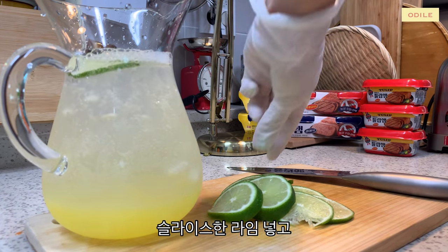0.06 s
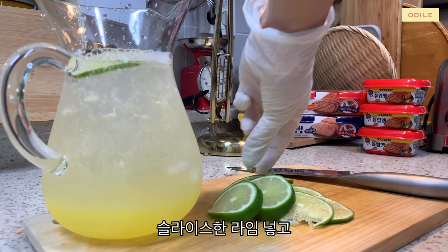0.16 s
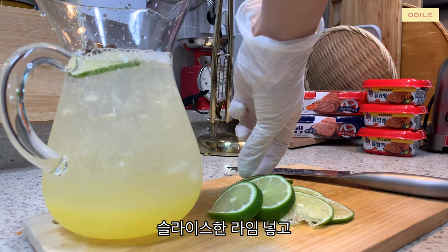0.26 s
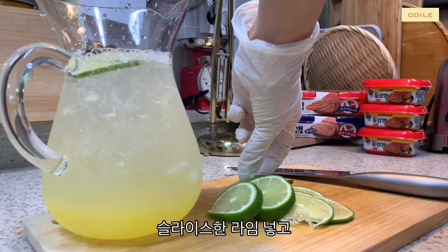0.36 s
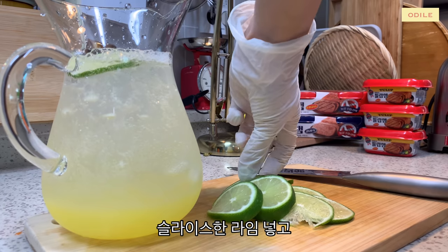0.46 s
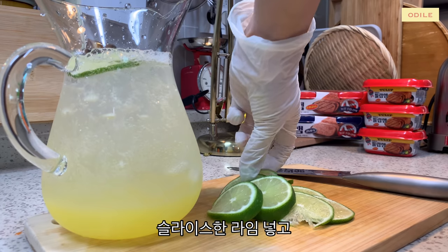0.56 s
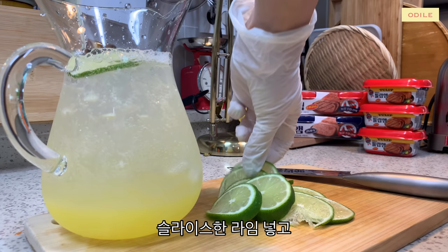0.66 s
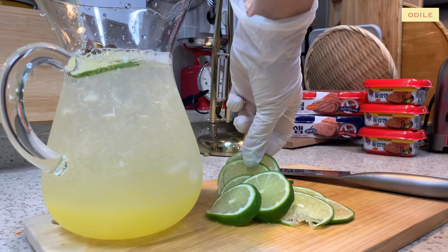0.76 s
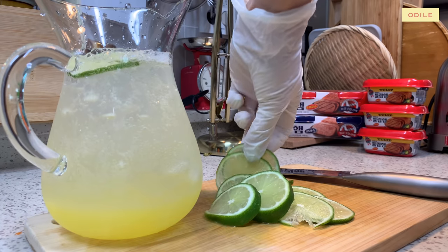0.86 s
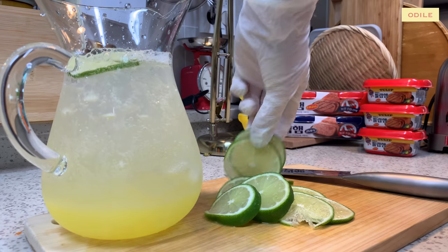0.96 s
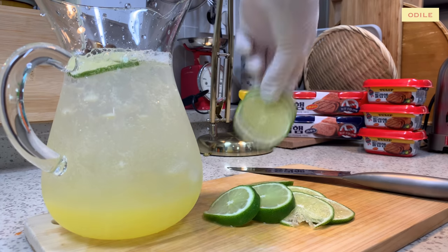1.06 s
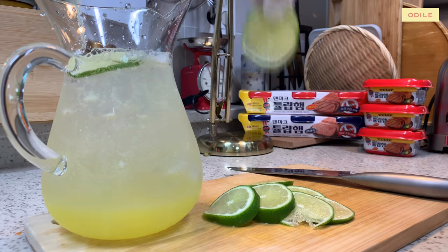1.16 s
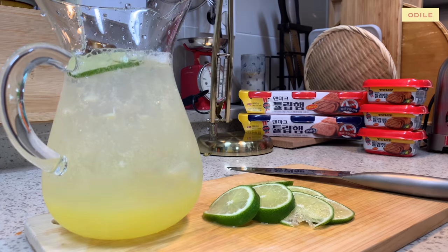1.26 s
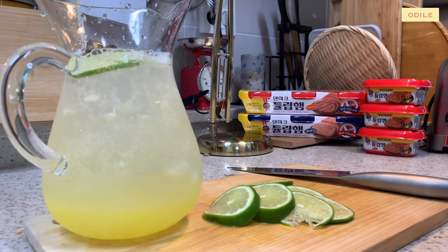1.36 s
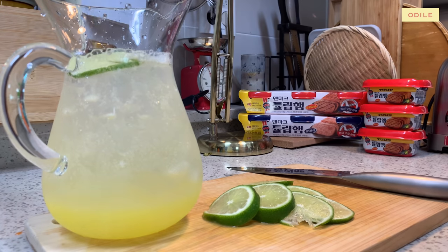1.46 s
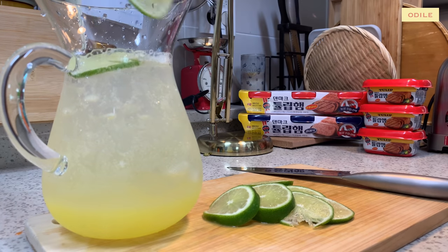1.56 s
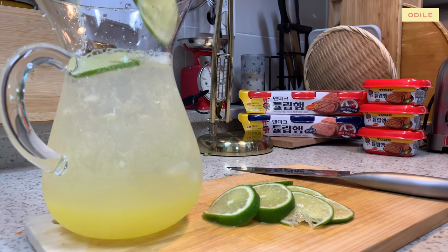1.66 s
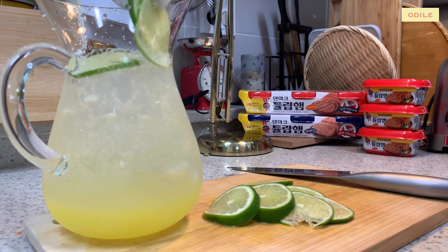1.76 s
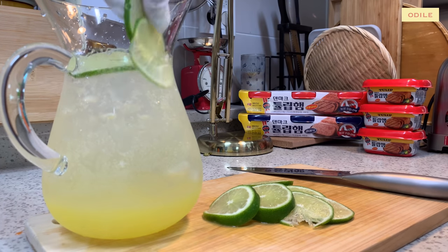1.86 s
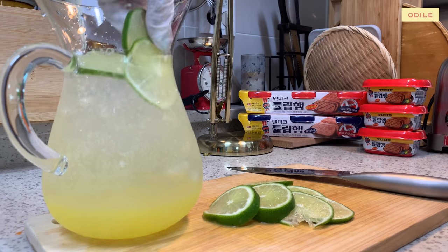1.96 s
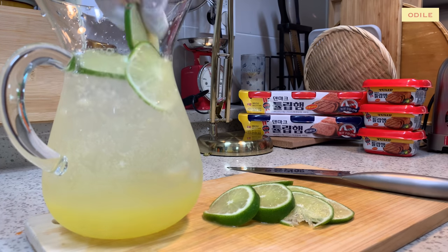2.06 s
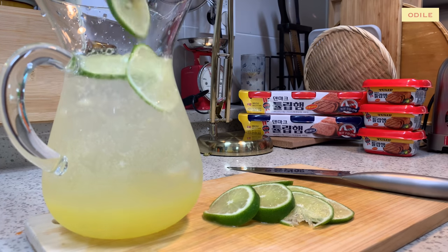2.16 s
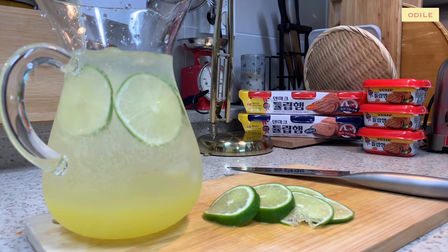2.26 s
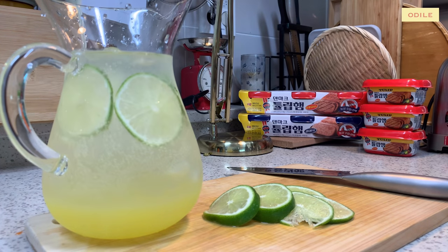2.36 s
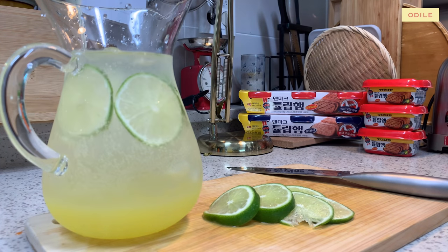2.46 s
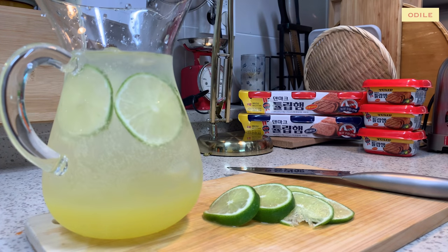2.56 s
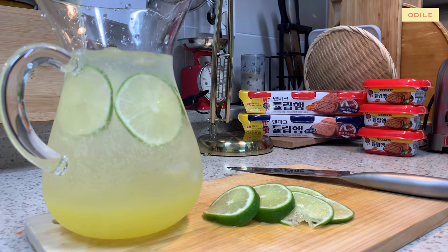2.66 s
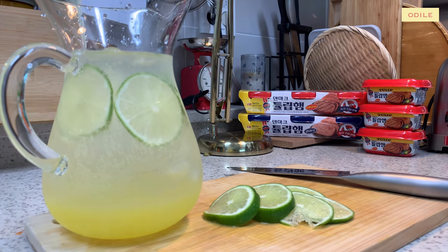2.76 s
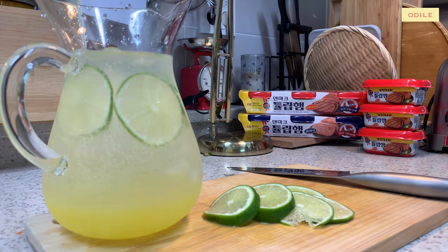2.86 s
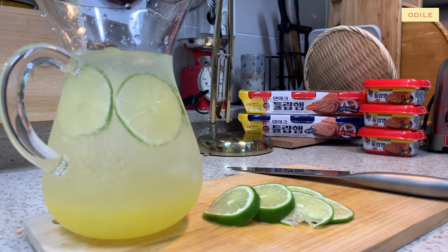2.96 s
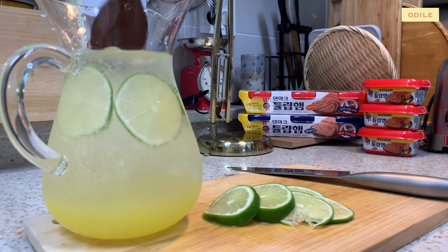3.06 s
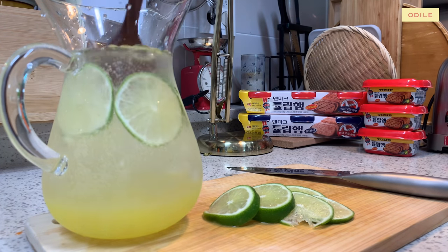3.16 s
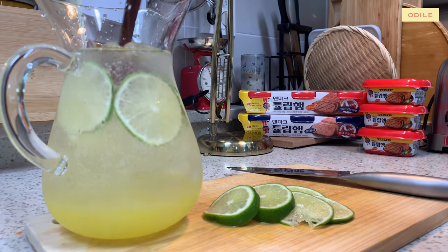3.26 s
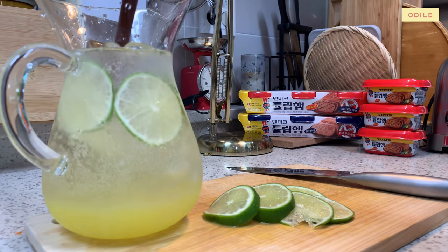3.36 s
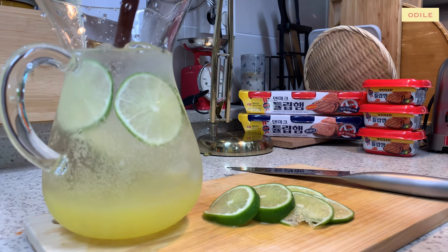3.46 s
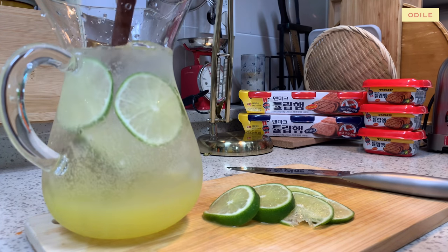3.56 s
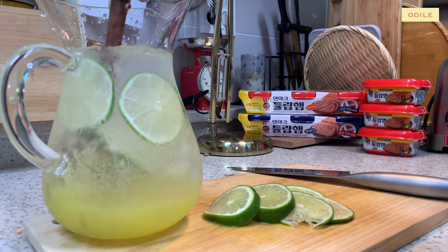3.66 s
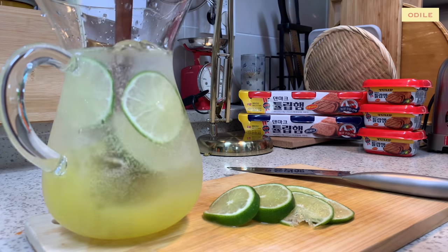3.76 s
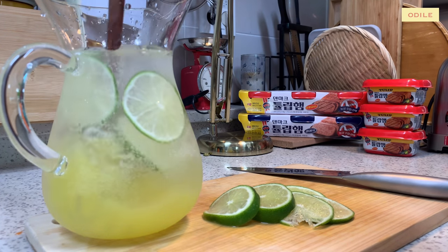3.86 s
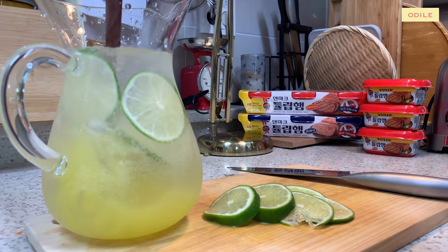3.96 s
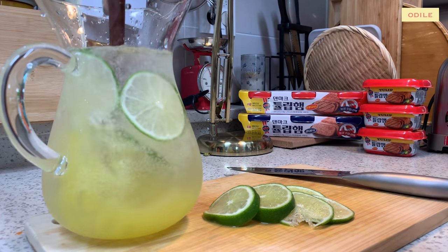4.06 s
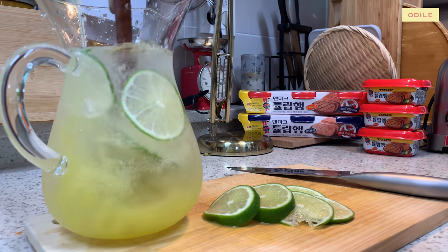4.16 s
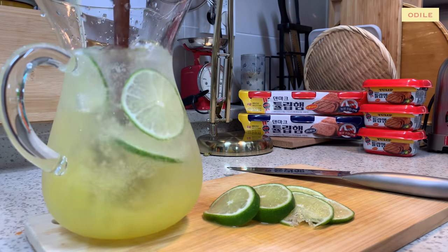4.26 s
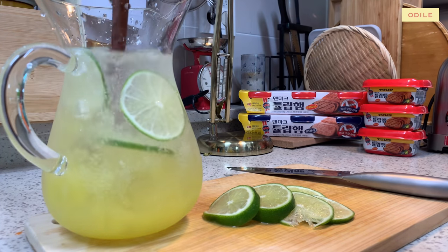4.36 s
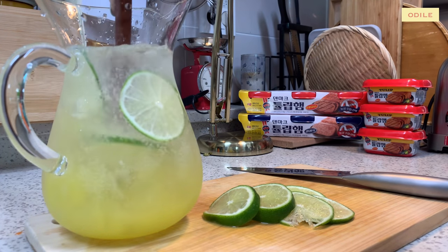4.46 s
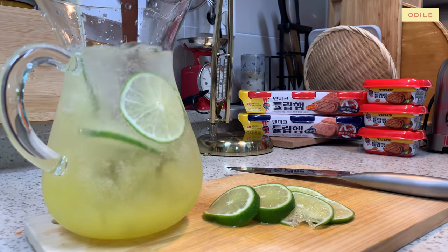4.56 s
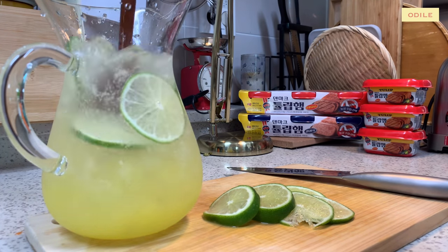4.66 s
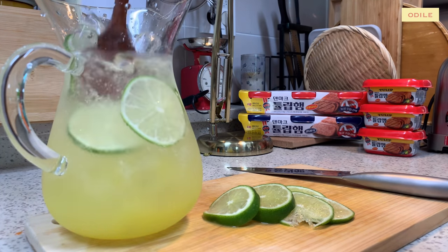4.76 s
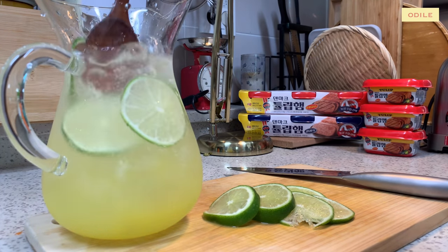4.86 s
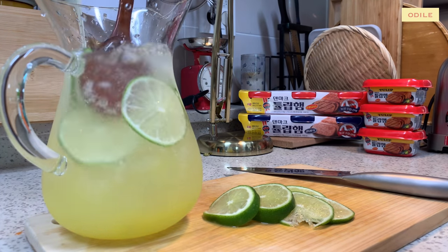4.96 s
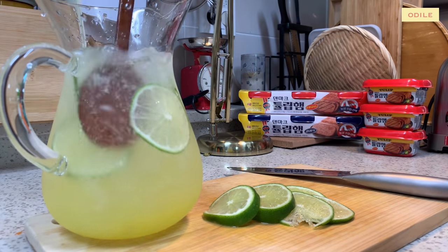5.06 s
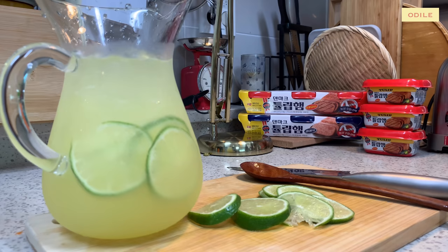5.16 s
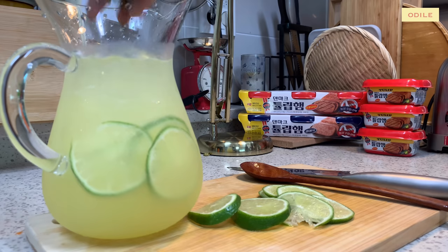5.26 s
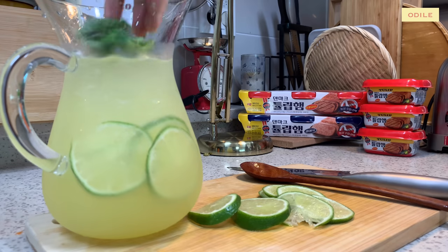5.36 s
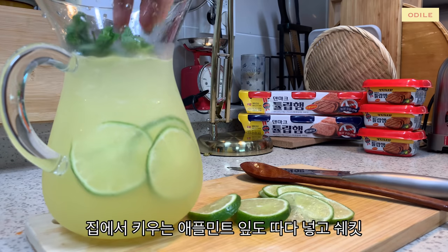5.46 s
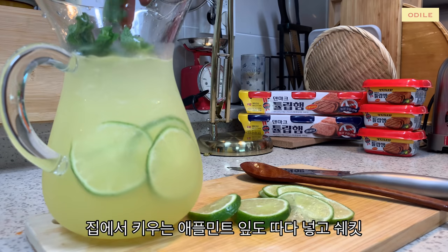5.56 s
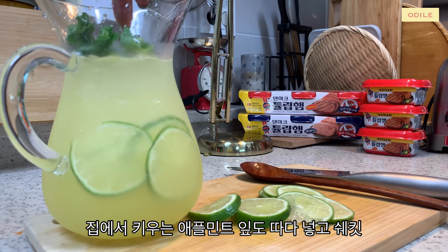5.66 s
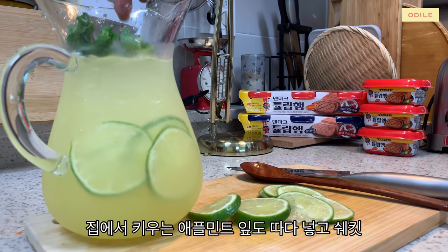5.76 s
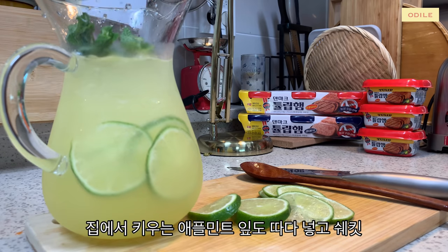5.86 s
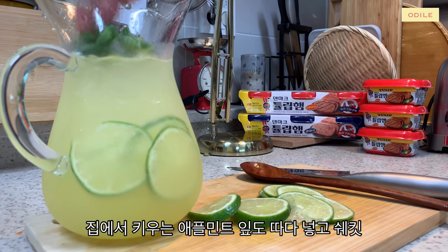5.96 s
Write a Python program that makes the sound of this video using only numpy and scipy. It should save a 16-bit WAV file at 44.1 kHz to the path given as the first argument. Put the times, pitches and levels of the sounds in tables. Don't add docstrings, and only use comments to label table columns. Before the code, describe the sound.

Fridge hum and faint glove crinkles, then lime slices drop onto ice in a glass pitcher, and a wooden spoon churns clattering cubes before leaves land.

```python
import sys
import numpy as np
from scipy import signal
from scipy.fft import rfft, irfft, next_fast_len
from scipy.io import wavfile
from scipy.ndimage import uniform_filter1d

SR = 44100
rng = np.random.default_rng(int(sys.argv[2]) if len(sys.argv) > 2 else 0)


def amplitude_ratio(level_db):
    exponent = np.asarray(level_db, float) / 20
    return 10 ** exponent


def generate_wav(signal):
    frames = np.transpose(np.atleast_2d(signal))
    scaled = np.clip(frames, -1, 1) * 32767
    pcm = np.round(scaled).astype(np.int16)
    wavfile.write(sys.argv[1], SR, pcm)


N = 264600

SCENE_CHANGES_S = [
    2.192,
    5.124,
]
# [pitch_hz, level_db, t60_s]
GLASS_MODES = [(2570, -6, .05), (2820, -7, .045), (3400, -19, .035), (3631, 0, .07), (3689, -1, .065),
               (3806, -6, .05), (3900, -10, .035), (4190, -12, .12)]
# [pitch_hz, level_db]
ICE_COLOUR = [(1500, -13), (2400, -2), (3300, 7), (5200, 1.5), (7200, 9), (8200, -6.5)]
# [pitch_hz, level_db]
TICK_COLOUR = [(6800, -7.5), (7800, 3.5), (9300, 1.5), (11500, -4.5), (14500, -6.5), (17000, -18)]


def evened(x):
    return x / np.sqrt(np.mean(x ** 2) + 1e-20)


def peaked(x):
    return x / (abs(x).max() + 1e-20)


def read(points, hz):
    f, value = np.transpose(points)
    return np.interp(np.log(hz + 1), np.log(f + 1), value)


def add(mix, s, sound):
    stop = min([change for change in SCENE_CHANGES_S if change > s] + [N / SR])
    part = mix[round(s * SR):round(stop * SR)][:len(sound)]
    part += sound[:len(part)]


def colour(x, points):
    log_gain = np.log(amplitude_ratio(read(points, abs(np.fft.fftfreq(2048, 1 / SR)))))
    taps = np.fft.ifft(np.exp(signal.hilbert(log_gain).conj())).real[:1024]
    return signal.oaconvolve(x, taps)[:len(x)]


def ring(modes, t):
    return sum(amplitude_ratio(db - 60 * t / t60) * np.sin(2 * np.pi * hz * t) for hz, db, t60 in modes)


def grains(per_s, spread_db, t60, rise=0.00059):
    size = amplitude_ratio(spread_db * np.minimum(rng.exponential(1, N), 4))
    size = size * (rng.random(N) < per_s / SR)
    fall = np.exp(-2 * np.log(1000) / (t60 * SR))
    swell = np.exp(-1 / (rise * SR))
    power = signal.lfilter([1 - swell], np.convolve([1, -fall], [1, -swell]), size ** 2)
    return evened(np.sqrt(abs(power) + 1e-12) * rng.standard_normal(N))


def contact(t60, rise):
    t = np.arange(1200) / SR
    return peaked(rng.standard_normal(len(t)) * amplitude_ratio(-60 * t / t60) * np.minimum(t / rise, 1))


def room_air():
    # [pitch_hz, level_db per Hz]
    air = [(25, -31), (53, -12), (85, -17), (172, -21), (218, -13), (258, -22), (320, -30), (390, -25),
           (650, -39), (960, -41.5), (1500, -48.5), (4000, -57.5), (7000, -50), (9500, -55), (14000, -56)]
    # [pitch_hz, likeness 0..1]
    likeness = [(60, .995), (250, .9), (450, .2), (1000, .05), (6300, .05), (7300, .45), (14000, .85)]
    frames, hz = N // 512 + 5, np.fft.rfftfreq(2048, 1 / SR)
    a, b, c, d, patches = rng.standard_normal((5, len(hz), frames))
    patches = uniform_filter1d(patches, size=14, axis=0)
    patches = evened(uniform_filter1d(patches, size=8, axis=1))
    same = np.clip(read(likeness, hz), -1, 1)[:, None]
    left = a + 1j * b
    right = same * left + np.sqrt(1 - same ** 2) * (c + 1j * d)
    z = np.array([left, right]) * amplitude_ratio(read(air, hz)[:, None] + 2.2 * patches)
    return amplitude_ratio(-56.5) * evened(signal.istft(z, nperseg=2048, noverlap=1536)[1][:, :N])


def fridge():
    # [pitch_hz, width_hz, level_db]
    tones = [(119.1, 2.5, -56), (238.4, 3, -56), (358, 5, -86), (476.6, 5, -84), (565.8, 6, -74),
             (735.5, 4, -86), (792, 5, -89), (961.5, 7, -82), (1580, 7, -96.5), (1610, 5.5, -87)]
    # [pitch_hz, left_over_right_db]
    balance = [(119, 2), (238, -4.5), (400, 0), (566, 6), (800, 0)]
    # [pitch_hz, lag_radians]
    lag = [(119, .35), (238, .85), (400, 0)]
    out, t = np.zeros((2, N)), np.arange(N) / SR
    hop, steps = 100, N // 100 + 2
    for hz, width_hz, db in tones:
        r = np.exp(-np.pi * width_hz * hop / SR)
        noise = rng.standard_normal(steps) + 1j * rng.standard_normal(steps)
        waver = signal.lfilter([1], np.convolve([1, -r], [1, -r]), noise)
        waver = np.interp(t, np.arange(steps) * hop / SR, waver)
        waver = 1 + 0.26 * waver / np.sqrt(np.mean(abs(waver) ** 2))
        tone = waver * np.exp(2j * np.pi * hz * t)
        aside = amplitude_ratio(.5 * read(balance, hz)) * np.exp(-.5j * read(lag, hz))
        out += amplitude_ratio(db) * (np.array([[aside], [1 / aside]]) * tone).real / np.std(tone.real)
    return out


def rustle():
    # [loudest_s, level_db, length_s]
    brushes = [(0.184, -71.5, 1), (0.53, -78, 0.15), (0.638, -62.5, 0.083), (0.824, -59.5, 0.038),
               (0.926, -76, 0.17), (1.721, -61, 0.088), (2.277, -71, 0.12), (2.453, -75.5, 0.23),
               (2.81, -74.5, 0.11), (2.967, -53.5, 0.023), (5.252, -77, 0.058), (5.366, -60.5, 0.18),
               (5.52, -73, 0.16)]
    crinkle_colour = [(900, -9.0), (2500, -5.0), (6000, -14.5), (10000, -7.5), (15000, -15.5)]  # Hz, dB
    edge_loss_db = 11.5
    t = np.arange(N) / SR
    brush = sum(amplitude_ratio(db - edge_loss_db * abs(t - s) / (length / 2)) for s, db, length in brushes)
    brush = brush * ((t < 3) | (t > SCENE_CHANGES_S[1]))
    return brush * evened(colour(grains(1400, 5.8, 0.014), crinkle_colour))


def snaps():
    # [start_s, peak_db, pitch_hz]
    creases = [(0.519, -58, 6000), (0.532, -53, 6150), (.533, -55, 10300), (.541, -60, 5900),
               (0.559, -62, 6200), (0.559, -53, 10200), (.585, -66, 6000), (.622, -56, 9500),
               (.669, -62, 9800), (.451, -56, 2100), (.6266, -63, 2000), (.6416, -65, 2400),
               (.685, -59, 2000), (.8007, -60, 2470), (.8117, -61, 1950), (.829, -59, 4800),
               (1.1, -66, 4200), (1.215, -58.5, 2900)]
    # [start_s, peak_db, pitch_hz]
    ice_snaps = [(1.7161, -45, 4300), (2.1155, -43, 5200), (2.3104, -30, 6000), (2.9595, -52, 5000),
                 (2.9862, -23, 4000), (3.0072, -22, 5600), (3.0627, -30, 6100), (3.0744, -27, 8500),
                 (3.1797, -22, 9000), (3.1259, -21, 5700), (3.1361, -21, 5700), (3.1566, -25, 6100),
                 (3.2239, -21, 9200), (3.2288, -20, 8800), (3.253, -24, 8800), (3.324, -24, 8900),
                 (3.3783, -25, 8200), (3.3898, -27, 6700), (3.4124, -29, 8800), (3.426, -26, 6500),
                 (3.4456, -20, 7700), (3.4808, -28, 8400), (3.5167, -32, 3700), (3.56, -26, 4100),
                 (3.575, -30, 3900), (3.5854, -20, 8700), (3.5974, -26, 5100), (3.6273, -22, 8900),
                 (3.6539, -22, 8300), (3.6981, -26, 7200), (3.8305, -16, 3900), (3.9361, -24, 5200),
                 (4.007, -22, 4600), (4.0517, -10, 9100), (4.057, -17, 8400), (4.085, -22, 5200),
                 (4.1029, -20, 6800), (4.1536, -25, 8600), (4.3078, -20, 5300), (4.4205, -32, 3600),
                 (4.4397, -24, 3200), (4.4519, -22, 5400), (4.4841, -21, 4900), (4.497, -19, 9200),
                 (4.5713, -19, 4000), (4.5952, -24, 8300), (4.6485, -16, 6900), (4.7489, -22, 3800),
                 (4.7851, -28, 3500), (4.8691, -18, 3200), (4.8854, -21, 4600), (4.9696, -26, 2900),
                 (5.0017, -22, 7500), (5.0412, -22, 4100), (5.082, -24, 7300), (5.1379, -49, 5700),
                 (5.1408, -49, 6700), (5.3956, -45, 6200), (5.9361, -39, 4600), (5.9822, -37, 4300)]
    t60_s, rise_s = .004, .0002
    out, t = np.zeros(N), np.arange(500) / SR
    for s, db, hz in ice_snaps + creases:
        chip = [(hz, 0, t60_s), (.63 * hz, -8.0, t60_s), (min(1.3 * hz, 14000), -5.0, 1.2 * t60_s)]
        add(out, s, amplitude_ratio(db + 2.5) * peaked(ring(chip, t) * np.minimum(t / rise_s, 1)))
    return out


def ticks(rows):
    cracks, brights, out = np.zeros(N), np.zeros(N), np.zeros(N)
    t = np.arange(3000) / SR
    for (s, db, glass_db, bright_db), luck in zip(rows, rng.random((len(rows), 17))):
        long = 0.31 + 1.52 * luck[-1]
        add(cracks, s, amplitude_ratio(db) * contact(0.0095 * long, 0.0011 * long))
        add(brights, s, amplitude_ratio(db + bright_db) * contact(0.011 * long, 0.0011 * long))
        wall = [(hz * (1 + .005 * (u - .5)), mode_db - 8.0 * v, t60)
                for (hz, mode_db, t60), u, v in zip(GLASS_MODES, luck, luck[8:])]
        struck = peaked(signal.fftconvolve(ring(wall, t), contact(.013, .002)))
        add(out, s, amplitude_ratio(db + glass_db + 4.0) * struck)
    return out + amplitude_ratio(8.0) * colour(cracks, ICE_COLOUR) + amplitude_ratio(7.5) * colour(brights, TICK_COLOUR)


def knocks(rows, t60=.03):
    out, t = np.zeros(N), np.arange(2000) / SR
    for (s, db, hz), luck in zip(rows, rng.random((len(rows), 7))):
        lowest, highest = max(600, hz / 1.6), min(2700, hz * 2)
        cube = [(hz, 0, t60)]
        cube += [(lowest ** (1 - u) * highest ** u, -10, .45 * t60) for u in luck]
        add(out, s, amplitude_ratio(db - 2.0) * peaked(signal.fftconvolve(ring(cube, t), contact(.003, .0006))))
    return signal.sosfilt(signal.butter(2, 480, "high", fs=SR, output="sos"), out)


def hits():
    # [start_s, blow_db, knock_hz, knock_db, bright_tick_db]
    small_hits = [(1.7205, -29, 1230, -26, -22), (1.7558, -37, 860, 14, -20), (1.8259, -38, 650, 6, -18),
                  (1.8521, -30, 696, -2, -7), (1.8615, -35.5, 1760, 8, -6), (1.8794, -37, 736, 4, -8),
                  (1.954, -34.5, 1120, 1.5, -24), (1.9849, -36.5, 1070, 1, -18),
                  (2.0133, -35.5, 850, -5, -5.5), (2.0662, -36, 1200, -3, -28), (2.1154, -31, 890, -6, -19),
                  (2.1844, -48.5, 735, -1, 1.5), (2.3105, -45.5, 1560, 7.5, 15.5),
                  (2.3994, -44, 714, -3, -17), (5.138, -50, 1510, -13, 3.5), (5.2277, -52.5, 704, 4, -10),
                  (5.2699, -47, 783, -3, -13), (5.3243, -37.5, 740, -12, 0), (5.3947, -41.5, 2520, -20, -7),
                  (5.935, -30, 1666, -18.5, -17), (5.9509, -22, 1460, -10.5, -8),
                  (5.9675, -24, 1050, -18, -21), (5.9844, -26, 743, -18.5, -29)]
    # [start_s, crack_db, bright_tick_db against the crack]
    ice_cracks = [(3.0025, -26.5, 8.5), (3.071, -31.5, 7), (3.1256, -24.5, 0.5), (3.155, -45, 23),
                  (3.1777, -42.5, 23), (3.2217, -28, 9.5), (3.2366, -44, 24.5), (3.253, -47.5, 26.5),
                  (3.3216, -41, 20), (3.3651, -31.5, 3), (3.4196, -45, 23), (3.4417, -21.5, 8),
                  (3.5857, -44.5, 26), (3.6162, -25, 5), (3.626, -27, 9), (3.6519, -47, 20.5),
                  (3.6925, -31, 9.5), (3.855, -34.5, 17.5), (4.0514, -31.5, 17.5), (4.083, -44, -12),
                  (4.132, -24.5, 4), (4.162, -27, 4.5), (4.3078, -36.5, 8.5), (4.45, -27.5, 3),
                  (4.4737, -27.5, 5.5), (4.4953, -22.5, 6.5), (4.5927, -29, 5.5), (5.0006, -30, 6),
                  (5.0574, -26.5, 5.5), (5.0876, -33.5, 13)]
    # [start_s, crack_db, glass_ring_db, bright_tick_db]
    clinks = [(2.9853, -33, -1, 7), (3.135, -50.5, -9, 16), (3.8203, -29.5, 13, -5),
              (3.8294, -32.5, -9, 12.5), (3.841, -37, -25, 15), (3.8649, -19, -8, -16),
              (3.915, -21, -23, 1.5), (3.9625, -23.5, -23, 11), (4.007, -32.5, -4, -5),
              (4.0942, -26.5, -31.5, 10), (4.197, -28, -0.5, -14), (4.2637, -28, -4.5, -2.5),
              (4.278, -20, -4.5, -10.5), (4.285, -23, -27.5, -6.5), (4.3129, -20.5, -18, 6),
              (4.4376, -29.5, -7.5, -10.5), (4.5394, -22, -3, -4.5), (4.5579, -23.5, -6, 8),
              (4.5686, -34, -11, -6.5), (4.641, -18, -11.5, 3.5), (4.696, -13, -11.5, 0.5),
              (4.7198, -24.5, 3, -9.5), (4.797, -30.5, 2, 3.5), (4.827, -24, 5.5, -1.5),
              (4.8327, -14.5, -6, 0.5), (4.8649, -23.5, -6.5, -12), (4.8857, -22, -9, -16),
              (4.9107, -32, 1, -4.5), (4.9235, -21, -4, -2), (5.0351, -20, -13.5, -8.5),
              (5.106, -28, -5.5, -13.5)]
    # [start_s, level_db, pitch_hz]
    dull_knocks = [(2.986, -20.5, 1090), (2.9863, -19, 1670), (4.7375, -19.5, 815), (3.1639, -23, 1180),
                   (3.2115, -14.5, 770), (3.2987, -18.5, 620), (3.3689, -17.5, 703), (3.4241, -18, 620),
                   (3.448, -17, 810), (3.5599, -15.5, 1330), (3.6161, -20, 1180), (3.6969, -31, 1930),
                   (3.8656, -20, 760), (3.9135, -19, 1440), (3.9684, -20, 750), (4.0565, -20.5, 734),
                   (4.0945, -21, 1270), (4.279, -18, 1390), (4.2915, -12.5, 1600), (4.3702, -18.5, 1625),
                   (4.438, -19, 2140), (4.6485, -15.5, 1587), (4.697, -15, 2530), (4.7236, -15, 1617),
                   (4.7988, -18.5, 2050), (4.8364, -8, 1200), (4.8673, -12.5, 835), (4.9017, -17.5, 2000),
                   (4.924, -18, 2550), (5.0583, -19.5, 1343)]
    # [start_s, level_db, pitch_hz]
    more_knocks = [(2.9912, -34, 1040), (3.0463, -24.5, 1000), (4.0575, -20.5, 684), (3.0711, -26, 820),
                   (3.1243, -25.5, 830), (3.1542, -30, 950), (3.3102, -27, 600), (3.3412, -24, 590),
                   (3.5161, -27, 1500), (3.5231, -36, 1580), (3.5501, -43, 840), (3.6437, -23.5, 624),
                   (3.6578, -22.5, 1110), (3.789, -27, 1295), (3.9619, -16, 1020), (4.1328, -17, 778),
                   (4.1637, -32, 800), (4.1876, -29, 793), (4.2133, -23.5, 1236), (4.2616, -27.5, 866),
                   (4.8663, -10.5, 1994), (4.3902, -35, 1696), (4.419, -28, 840), (4.567, -22.5, 1079),
                   (4.6001, -24, 650), (4.6061, -20.5, 1147), (4.6392, -24.0, 1540), (4.8068, -29, 1365),
                   (4.8406, -4.5, 1980), (4.9116, -14, 2560), (4.9282, -18.5, 2910), (4.9375, -18.5, 2576),
                   (4.9681, -18, 2530), (5.0044, -26.5, 713), (5.0387, -16, 2730), (5.0918, -18.5, 1587)]
    small_glass_db, crack_glass_db = -8.5, -25.5
    small_ticks = [(s, db - 13.5, small_glass_db, tick + 7.2) for s, db, hz, knock, tick in small_hits]
    small_knocks = [(s, db + knock - 3.0, hz) for s, db, hz, knock, tick in small_hits]
    cracks = [(s, db, crack_glass_db, tick) for s, db, tick in ice_cracks]
    return ticks(cracks + clinks + small_ticks) + knocks(dull_knocks + small_knocks + more_knocks)


def pings():
    # [start_s, peak_db, pitch_hz]
    notes_heard = [(1.7205, -41, 3750), (1.7555, -34, 960), (1.756, -37, 2570), (1.832, -36, 603),
                   (1.854, -28, 1340), (3.0035, -17, 3645), (3.369, -33, 732), (3.4415, -20, 5750),
                   (3.86, -26, 614), (3.9645, -20, 5420), (4.279, -11.5, 1254), (4.2855, -21.5, 4900),
                   (4.3135, -25, 3670), (4.6395, -26, 5000), (4.6455, -22, 3340), (4.6975, -16.5, 3580),
                   (4.7375, -22.5, 2880), (4.8075, -23.5, 3645), (4.8395, -25.5, 2180), (4.87, -24, 770),
                   (4.9235, -21, 2645), (4.9265, -24, 3590), (5.9505, -33, 3780)]
    t60_s, rise_s = 0.014, 0.0024
    out, t = np.zeros(N), np.arange(2000) / SR
    for s, db, hz in notes_heard:
        add(out, s, ring([(hz, db + 2.5, t60_s)], t) * np.minimum(t / rise_s, 1))
    return out


def push_gain(rows):
    rise_s, settle_db_per_s = .01, 281.5
    gain = np.zeros(N)
    for s, length, db, sag_db in rows:
        t = np.arange(0, length + .3, 1 / SR)
        lost_db = sag_db * np.minimum(t / length, 1) + settle_db_per_s * np.maximum(t - length, 0)
        add(gain, s, amplitude_ratio(db - lost_db) * np.minimum(t / rise_s, 1))
    return gain


def slosh():
    pockets_hz = [700, 1000, 1400, 1950, 2600]
    width = .45
    pockets = [signal.lfilter(*signal.iirpeak(hz, 1 / width, SR), grains(220, 2.6, .012))
               for hz in pockets_hz]
    return sum(evened(pocket) for pocket in pockets)


def jostle():
    # [start_s, length_s, level_db, lost_db by its end, wet_db]
    pushes = [(1.737, 0.49, -51.5, 20.5, 3), (2.32, 0.1, -59, 7, -7), (2.985, 2.02, -46, -6, -1),
              (2.986, 0.062, -48, -2.5, -24), (3.093, 0.064, -46, 17, -9), (3.293, 0.094, -35, -5, -21),
              (3.435, 0.28, -41, -4, -8.5), (3.805, 0.13, -27.5, 11.5, -6.5), (4.04, 0.18, -31, 7, -11),
              (4.26, 0.028, -32, 2, -6), (4.437, 0.18, -33, 6.5, -7.5), (4.606, 0.097, -34, -3.5, -11.5),
              (4.784, 0.15, -32, 6.5, -9), (5.029, 0.078, -36, -10, -19), (5.923, 0.046, -54, -9.5, -9)]
    # [start_s, length_s, level_db, lost_db by its end]
    drags = [
        (1.717, 0.015, -33, 27),
        (2.113, 0.016, -65, 8),
        (4.54, 0.073, -44, 3),
        (4.7, 0.03, -44, 0.5),
        (4.79, 0.14, -39.5, -3),
        (4.745, 0.043, -47, 6.5),
    ]
    # [pitch_hz, level_db]
    wet_colour = [(350, -27), (600, -8.5), (900, -4), (1600, -1.5), (2500, -6), (3500, -23.5)]
    touch = grains(700, 3.2, .008)
    wall = evened(signal.oaconvolve(touch, ring(GLASS_MODES, np.arange(3000) / SR))[:N])
    dry_ice = evened(colour(touch, ICE_COLOUR)) + amplitude_ratio(3.24) * evened(colour(touch, TICK_COLOUR))
    dry_ice = dry_ice + amplitude_ratio(-8.5) * wall
    wet = evened(colour(slosh(), wet_colour))
    busy_gain = push_gain([row[:4] for row in pushes])
    wet_gain = push_gain([(s, length, db + wet_db, sag) for s, length, db, sag, wet_db in pushes])
    return amplitude_ratio(-10.0) * busy_gain * dry_ice + push_gain(drags) * wall + amplitude_ratio(-1.5) * wet_gain * wet


def counter():
    # [start_s, peak_db, pitch_hz, t60_s]
    bumps = [(1.759, -43.5, 284, 0.14), (3.037, -35, 58, 0.18), (3.212, -37.5, 59, 0.27),
             (3.299, -41.5, 73, 0.36), (3.222, -35, 310, 0.11), (3.44, -28.5, 40.4, 0.13),
             (3.452, -28, 280, 0.07), (3.869, -34.5, 299, 0.15), (3.971, -28, 77, 0.17),
             (3.999, -24, 45.8, 0.082), (4.281, -38.5, 96.9, 0.029), (4.368, -38.5, 102.2, 0.65),
             (4.374, -36.5, 294, 0.1), (4.394, -26.5, 48, 0.17), (4.677, -28.5, 105, 0.055),
             (4.185, -34.5, 303, 0.089), (4.935, -36.5, 91, 0.24)]
    # [time_s, level_db]
    boom = [
        (2.98, -44.5),
        (3.48, -36.5),
        (3.55, -47),
        (3.68, -37),
        (3.79, -47.5),
        (3.87, -35.5),
        (4.11, -49),
        (4.59, -43),
        (5.12, -44.5),
    ]
    # [pitch_hz, level_db]
    wood_colour = [(90, -18.5), (180, 2), (300, 2), (400, -19), (600, -16)]
    out, t = np.zeros(N), np.arange(9000) / SR
    for s, db, hz, t60 in bumps:
        bump = amplitude_ratio(db - 60 * t / max(t60, .03)) * np.sin(2 * np.pi * hz * t)
        add(out, s, bump * np.minimum(t / 0.0018, 1))
    out = signal.sosfilt(signal.butter(2, 42, "high", fs=SR, output="sos"), out)
    s, db = np.transpose(boom)
    boom_gain = amplitude_ratio(np.interp(np.arange(N) / SR, s, db - 2.0, -150, -150))
    return out + boom_gain * evened(colour(grains(200, 0.51, 0.0089), wood_colour))


def kitchen(x, turns=2.3):
    # [pitch_hz, t60_s]
    decay = [(300, 0.14), (1000, 0.09), (4000, 0.17), (12000, 0.025)]
    size = SR // 3
    taps = np.zeros((6, size))
    at = np.arange(40, size - 20, 20) + rng.integers(0, 20, (6, (size - 41) // 20))
    np.put_along_axis(taps, at, rng.choice([-1., 1.], at.shape), 1)
    hz, t, z = signal.stft(taps, SR, nperseg=256)
    tail = signal.istft(z * amplitude_ratio(-60 * t / read(decay, hz)[:, None]), SR, nperseg=256)[1]
    turn = 2 * np.pi * (turns * np.arange(len(x)) / SR + np.arange(3)[:, None] / 3)
    fed = np.tile(x * np.cos(turn) * np.sqrt(2 / 3), (2, 1))
    wet = signal.fftconvolve(fed, tail / np.linalg.norm(tail[0]), axes=1)[:, :len(x)]
    return wet.reshape(2, 3, -1).sum(1)


def pitcher(near):
    # [pitch_hz, shift_db]
    sway = [(1000, -25), (1700, -9), (5500, -9), (7000, -15), (12000, -10.5)]
    circles_per_s = [2.3, 5.9, 13.1]
    t, size = np.arange(len(near)) / SR, next_fast_len(len(near))
    place = evened(sum(np.sin(2 * np.pi * rate * t) for rate in circles_per_s))
    sway_gain = amplitude_ratio(read(sway, np.fft.rfftfreq(size, 1 / SR)))
    quarter_turn = irfft(1j * sway_gain * rfft(near, size), size)[:len(near)]
    shift = place * quarter_turn
    return amplitude_ratio(-0.5) * np.array([near + shift, near - shift]) + amplitude_ratio(-4.0) * kitchen(near)


def scene():
    near = hits() + snaps() + pings() + jostle() + rustle()
    changes = [round(s * SR) for s in SCENE_CHANGES_S]
    parts = zip(np.split(near, changes), np.split(counter(), changes))
    takes = [pitcher(inside) + below for inside, below in parts]
    for take in takes[:-1]:
        take *= np.minimum(np.arange(take.shape[1])[::-1] / 130, 1)
    return np.hstack(takes) + room_air() + fridge()


def thin_out(x, under_db=-7., top_db=-80., jump_db=4.5):
    hz, t, z = signal.stft(np.array([x[0] + x[1], x[0] - x[1]]) / 2, SR, nperseg=2048)
    hz = hz[:1024, None]
    power = (abs(z[:, :1024]) ** 2).reshape(2, 64, 16, -1).mean(2).repeat(16, 1)
    loud = power[:, 280:].sum((0, 1)) + 1e-20
    steady = abs(np.gradient(np.log(loud))) < np.log(amplitude_ratio(jump_db))
    weak = (power < amplitude_ratio(2 * under_db) * power[::-1]) & (hz > 2200) & steady
    weak[0] |= (abs(hz - 11700) < 620) & (power[0] < power[1]) & steady
    weak |= (power < amplitude_ratio(2 * top_db)) & (hz > 15150)
    z[:, :1024] *= ~weak
    mid, side = signal.istft(z, SR, nperseg=2048)[1][:, :N]
    return np.array([mid + side, mid - side])


def top_cut(x):
    return signal.sosfilt(signal.butter(12, 16970, fs=SR, output="sos"), x)


def record(dry):
    # [pitch_hz, level_db]
    width = [(5000, 0), (6500, -4), (7500, -4), (9000, -2.5), (16000, 0)]
    # [pitch_hz, lead_radians]
    port_phase = [(0, 0), (200, .25), (300, 1), (460, 1.4), (700, .8), (950, .8), (1300, 1.7), (1750, 3.2),
                  (2900, 3.4), (4500, 6.4), (5500, 5.3), (7000, 3.14), (16400, -9.42), (22050, -17)]
    # [pitch_hz, left_over_right_db]
    port_balance = [(200, .5), (450, 2), (700, 8), (1100, 3), (2500, 1.5), (4000, 1), (5500, -2.5),
                    (6500, 0)]
    # [pitch_hz, level_db]
    band_edges = [(22, -22), (45, 0), (15200, 0), (15900, -14), (16800, -26)]
    hz = np.fft.rfftfreq(N, 1 / SR)
    left, right = rfft(dry)
    mid = (left + right) / 2
    side = (left - right) / 2 * amplitude_ratio(read(width, hz))
    half = np.exp(.5j * np.interp(hz, *np.transpose(port_phase))) * amplitude_ratio(.5 * read(port_balance, hz))
    ports = np.array([(mid + side) * half, (mid - side) / half])
    mix = thin_out(irfft(ports * amplitude_ratio(read(band_edges, hz)), N))
    return top_cut(mix)


dry = scene()
out = record(dry)
generate_wav(out)
```